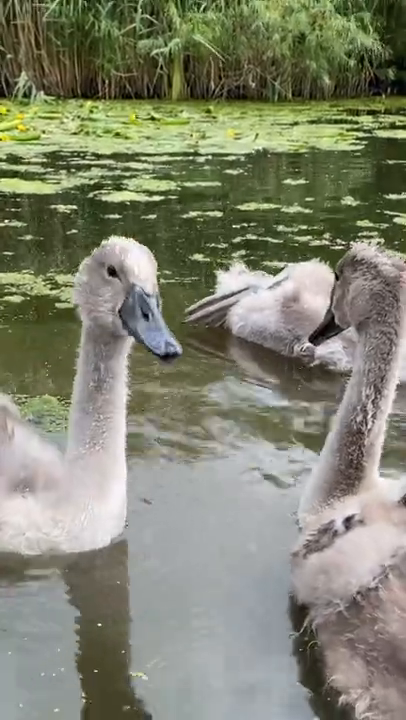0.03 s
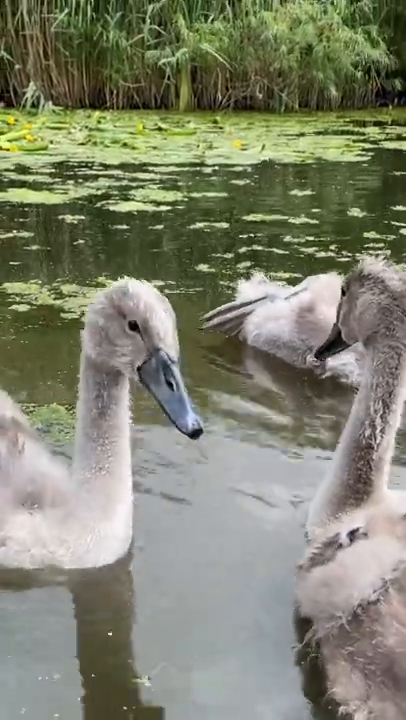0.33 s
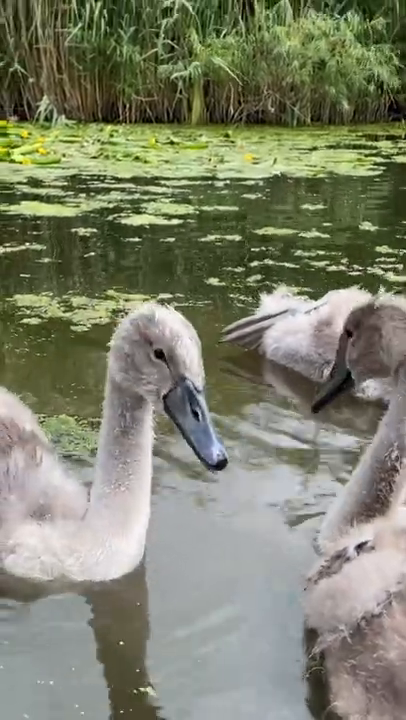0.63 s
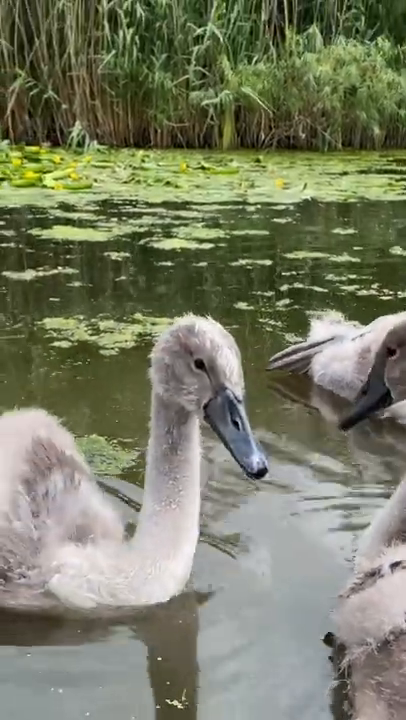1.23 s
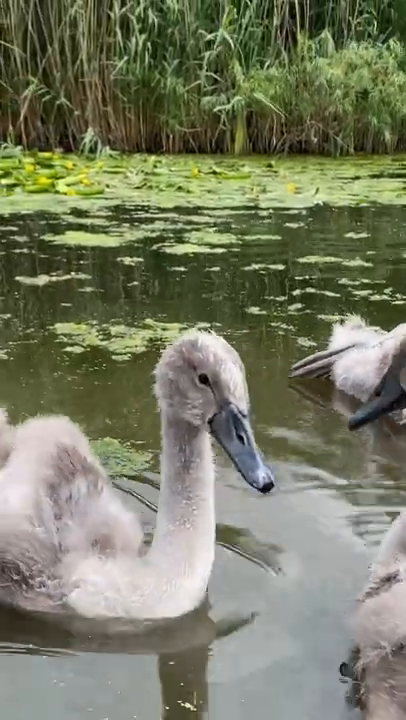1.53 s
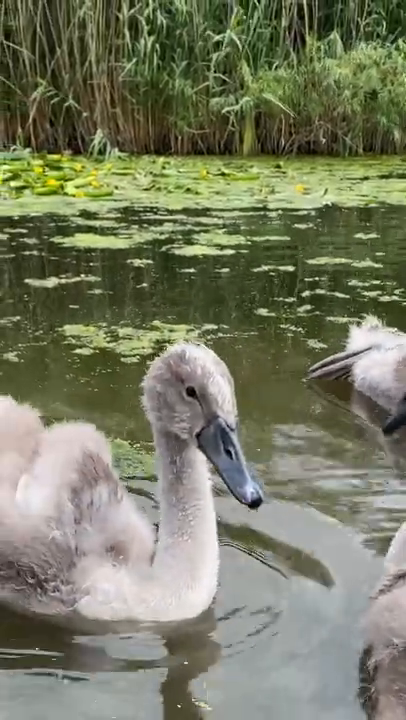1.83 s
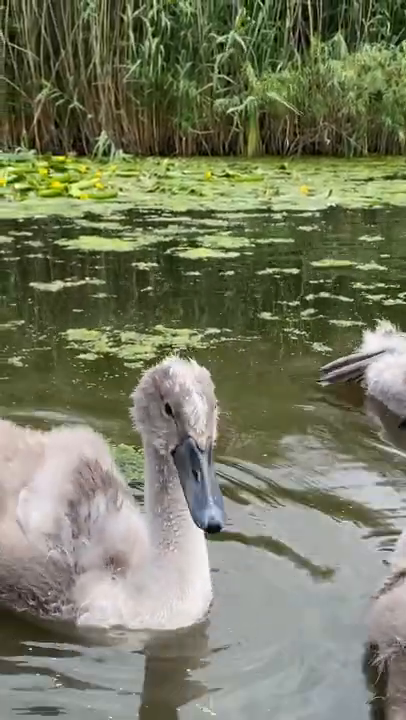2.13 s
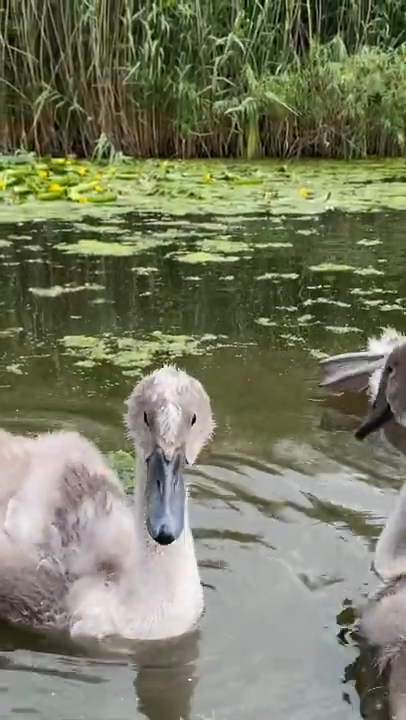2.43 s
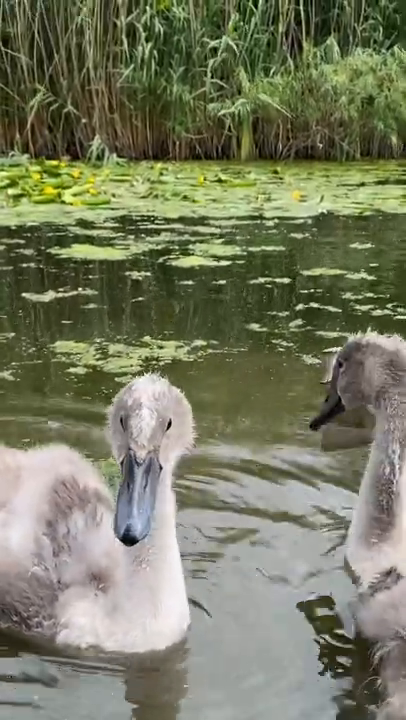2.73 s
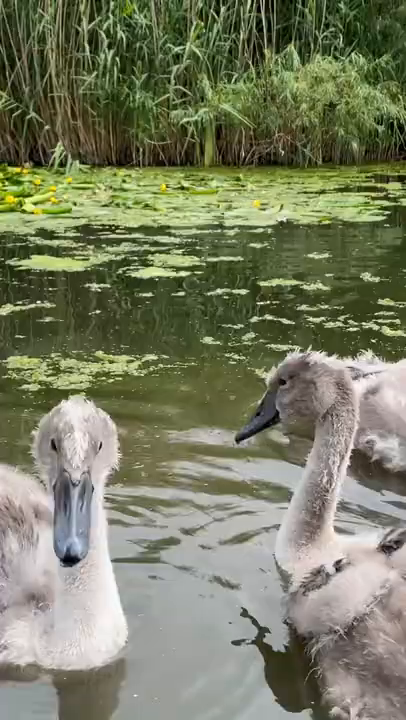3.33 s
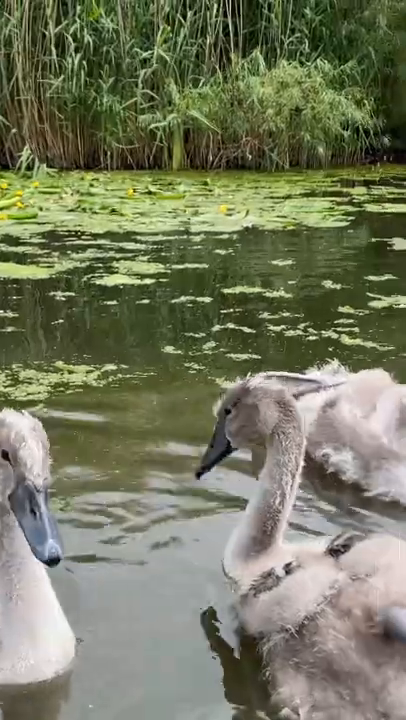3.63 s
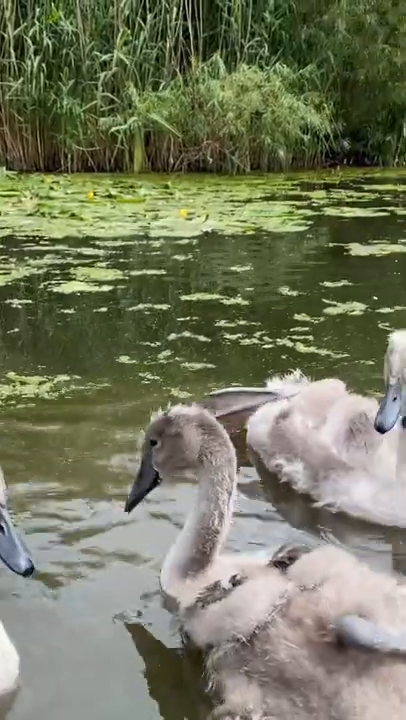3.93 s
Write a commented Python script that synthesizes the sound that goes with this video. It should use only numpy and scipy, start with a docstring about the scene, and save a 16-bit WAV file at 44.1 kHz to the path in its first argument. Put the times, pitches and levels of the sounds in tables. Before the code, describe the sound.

Young swans peep close by over soft paddling, water drips and a low rumble.

```python
"""Cygnets on a pond, close to a stereo microphone. From the start a low rumble and the whine of a
distant machine lie under them. One peep opens the scene and a few drops tick on the water. From about
one second the birds peep in short falling notes, and a splashy, bubbling rustle swells as they paddle.
After two seconds it fades and the notes turn to rising ones, many with a fast flutter. The drops come
thicker, and the loudest peeps follow just after three seconds."""
import sys
import numpy as np
from scipy import signal
from scipy.fft import rfft, irfft
from scipy.io import wavfile

SR = 44100
rng = np.random.default_rng(int(sys.argv[2]) if len(sys.argv) > 2 else 0)


def digitize_waveform(pressure):
    """Quantize a signal to 16-bit integers and store it at the path in sys.argv[1].

    Rows of a 2-D input are taken as channels; values are limited to [-1, 1].
    """
    field = np.atleast_2d(pressure).T
    bounded = np.clip(field, -1, 1)
    quanta = np.round(bounded * 32767).astype(np.int16)
    wavfile.write(sys.argv[1], SR, quanta)


N = 176400
T = np.arange(N) / SR

# The calls, close by. Each row: start in seconds, length in seconds, level in dB, top pitch in Hz,
# glide as a share of that pitch, flutter depth (capped at 1), flutter rate in Hz,
# centre of the strain as a share of the note, overtone boost in dB.
FALLING_PEEPS = [(0.876, 0.037, -62, 2180, 0.061, 0.4, 60, .5, 0),
                 (1.084, 0.051, -45, 2372, 0.11, 0.4, 62.4, 0.15, 5),
                 (1.249, 0.039, -56.5, 2090, 0.056, 0.42, 60, 0.41, 0),
                 (1.29, 0.072, -40, 2440, 0.19, 0.1, 60, 0.45, -1),
                 (1.419, 0.054, -42.5, 2440, 0.13, 1.1, 43.8, 0.18, 11),
                 (1.512, 0.062, -42, 2500, 0.23, 0, 60, 0.51, -13),
                 (1.603, 0.055, -44, 2520, 0.15, 1.2, 48.7, 0.34, 12),
                 (1.76, 0.045, -45, 2430, 0.13, 0.3, 60, 0.41, 0),
                 (1.791, 0.056, -43.5, 2510, 0.24, 0.87, 59, 0.47, -5),
                 (2.019, 0.058, -48, 2500, 0.2, 1.1, 78.5, 0.28, 8)]
RISING_PEEPS = [(-.07, 0.11, -37, 2243, 0.075, 0.057, 70, 0.34, -8),
                (2.09, .11, -54, 2275, 0.12, 0.95, 69.6, .5, 7),
                (2.29, 0.1, -59, 2280, 0.11, 0.67, 69, 0.15, 14),
                (2.349, 0.058, -60.5, 1814, -0.015, .2, 70, 0.34, -10),
                (2.5, 0.075, -57, 2210, 0.11, 0.22, 70, 0.089, 13.5),
                (2.551, 0.09, -54, 1994, 0.037, 0.22, 70, 0.57, -8),
                (2.75, 0.095, -61, 2004, .04, 0.22, 70, 0.46, 5),
                (2.874, 0.083, -44.5, 2016, 0.048, 0.47, 71.6, 0.55, -1.5),
                (3.099, .1, -33.5, 2280, 0.1, 0.8, 75, 0.63, 2),
                (3.335, 0.12, -36, 2320, 0.11, 0.83, 68.3, 0.295, 2)]
# Pitch through a note. Each row: share of the note, share of the glide below the top pitch.
FALL_PATH = [(0, .2), (.08, 0), (.32, .08), (.65, .45), (1, 1.05)]
RISE_PATH = [(0, 1), (0.351, 0.499), (.72, 0.0043), (.87, 0.085), (1, 1.17)]
# Loudness through a note. Each row: share of the note, gain in dB.
FALL_SHAPE = [(0, 3.5), (.18, 3), (.7, 0.5), (1, -14.5)]
RISE_SHAPE = [(0, -8), (.3, 0), (0.581, 3), (.82, -1), (1, -12)]
FALL_OVERTONES_DB, RISE_OVERTONES_DB = [-21, -29, -48], [-11, -29, -43]   # weights of harmonics 2 to 4
def cygnets():
    """The young birds near the microphone: nearly pure falling peeps and brighter rising ones."""
    falling = sum(peep(*row, FALL_PATH, FALL_SHAPE, FALL_OVERTONES_DB) for row in FALLING_PEEPS)
    rising = sum(peep(*row, RISE_PATH, RISE_SHAPE, RISE_OVERTONES_DB) for row in RISING_PEEPS)
    return falling + rising


STRAIN_SPAN_S, RELAXED_DB, RASP = 0.048, -11, .45
PINCH_BEND, JITTER = .03, .006   # shares of the top pitch
ATTACK_S, RELEASE_S = .004, 0.0061
def peep(start, length, db, top_hz, glide, depth, flutter_hz, centre, boost_db, path, shape, overtones_db):
    """One gliding whistle. Where the voice strains it brightens, rasps and flutters."""
    t = np.arange(int(length * SR)) / SR
    share = t / length
    from_centre = t - centre * length
    strain = np.exp(-(from_centre / STRAIN_SPAN_S) ** 4)
    flutter = np.clip(depth, 0, 1) * strain
    opening = abs(np.sin(np.pi * flutter_hz * from_centre))
    # Each pinch of the flutter bends the pitch down and trades the fundamental for overtones.
    pinch = flutter * (1 - opening) ** 1.25
    hz = top_hz * (1 - glide * along(path, share) - PINCH_BEND * pinch ** 2 + JITTER * drift(200)[:len(t)])
    phase = 2 * np.pi * np.cumsum(hz) / SR
    overtones = sum(from_db(weight) * np.sin(k * phase) for k, weight in enumerate(overtones_db, 2))
    rasp = 1 + RASP * strain * drift(360)[:len(t)]
    brightness = (1 - flutter * opening ** 2) * from_db(boost_db + RELAXED_DB * (1.5 - strain))
    voice = np.sin(phase) * (1 - pinch) + overtones * rasp * brightness
    ramp = np.clip(np.minimum(t / ATTACK_S, (length - t) / RELEASE_S), 0, 1)
    envelope = np.sin(np.pi / 2 * ramp) ** 2 * from_db(db + along(shape, share))
    return np.interp(T - start, t, np.sqrt(2) * voice * envelope, 0, 0)


# Drops on the near water. Each row: start in seconds, level in dB, ring pitch in Hz, splat boost in dB.
DROPS = [(.092, -48, 6500, -7), (.168, -54.5, 4000, 0), (0.646, -51.5, 3440, -30), (.756, -54, 3800, -3),
         (1.183, -54.5, 3420, -3), (2.623, -49, 3050, -1), (2.646, -44.5, 2280, -12),
         (2.693, -42, 1420, -22), (2.698, -51, 2850, 4), (2.704, -55, 2950, 6), (2.724, -47, 5440, -15),
         (2.831, -51.5, 8200, 1), (2.851, -47, 7200, 2), (2.858, -49, 5560, -3), (2.925, -33.5, 4880, -7.5),
         (2.931, -38, 9500, -8), (2.944, -36.5, 3980, -21), (3.054, -45, 3900, -7),
         (3.071, -49.5, 2290, -3), (3.386, -47.5, 3960, -9), (3.483, -46.5, 2170, -26),
         (3.501, -41, 6030, -6.5), (3.683, -39.5, 10700, -12.5), (3.754, -36.5, 13000, -14),
         (3.976, -46, 9050, -8), (3.982, -44, 3550, -2)]
DROP_CYCLES = 87   # to die away by 60 dB
SPLAT_BAND_HZ, SPLAT_DECAY_S, SPLAT_DB = (1810, 15000), .0014, 6.5
def drops():
    """Each drop is a tiny splat and the short ring of a bubble."""
    t, out = np.arange(SR // 20) / SR, 0
    band = signal.butter(1, SPLAT_BAND_HZ, "band", fs=SR, output="sos")
    for start, db, hz, boost_db in DROPS:
        splat = signal.sosfilt(band, rng.standard_normal(len(t)) * np.exp(-t / SPLAT_DECAY_S))
        ring = np.sin(2 * np.pi * hz * t) * from_db(-60 * t * hz / DROP_CYCLES)
        drop = from_db(db) * (ring + from_db(SPLAT_DB + boost_db) * splat)
        out += np.interp(T - start, t, drop, 0, 0)
    return out


# Slaps, close by. Each row: start in seconds, level in dB, decay time in seconds.
SLAPS = [(1.659, -37, 0.0037), (1.829, -48, 0.0039), (1.847, -37, 0.0025), (2.697, -40, 0.004),
         (2.712, -52, 0.019), (3.313, -48, 0.0055), (3.328, -49, 0.0047), (3.468, -58, .003),
         (3.501, -44, 0.0034)]
SLAP_BAND_HZ, SLAP_ATTACK_S = (700, 4100), 0.00056
def slaps():
    """Water slaps against the birds: short, broad bursts of noise."""
    band = signal.butter(2, SLAP_BAND_HZ, "band", fs=SR, output="sos")
    envelope = 0
    for start, db, decay in SLAPS:
        age = np.maximum(T - start, 0)
        envelope += from_db(db) * np.minimum(age / SLAP_ATTACK_S, 1) * np.exp(-age / decay)
    return envelope * rms_one(signal.sosfilt(band, rng.standard_normal(N)))


# Colours of the splashy rustle and its hiss. Each row: frequency in Hz, relative density in dB.
RUSTLE_COLOUR = [(250, -7), (900, 4), (1600, -2.5), (2100, 6), (2600, -0.5), (3000, 7), (3550, -2),
                 (4150, 10), (5000, -4.5), (5800, 4), (6900, -4.5), (7800, 6), (8400, -3.5), (8950, 5),
                 (9400, -5), (10200, 2.5), (11400, -15), (12200, 1), (12800, -12), (16000, -56)]
HISS_COLOUR = [(300, -16), (1000, -24.5), (2600, 5), (3100, 1.5), (3600, 1), (4200, 4), (5000, -3),
               (5850, 6.5), (6900, -7.5), (7900, -2.5), (9400, -1), (10300, 5), (11400, 0), (12200, -7),
               (12900, -21), (16000, -37)]
# Their swells. Each row: time in seconds, level in dB.
RUSTLE_LEVEL = [(1.3, -90), (1.55, -59), (1.66, -45), (1.77, -43.5), (1.86, -47.5), (1.94, -43),
                (2.03, -47), (2.1, -56.5), (2.25, -84)]
HISS_LEVEL = [(0, -90), (1.15, -80), (1.28, -62), (1.55, -55.5), (2.1, -56.5), (2.45, -57), (2.62, -64.5),
              (2.85, -69.5), (4, -73)]
GRAIN_DB, GRAIN_HZ = 1.3, 150
def rustle():
    """Paddling close by: a thin hiss comes and goes, and a finely grained rustle swells twice over it."""
    swells = patchy(noise(RUSTLE_COLOUR)) * from_db(along(RUSTLE_LEVEL, T) + GRAIN_DB * drift(GRAIN_HZ))
    return swells + noise(HISS_COLOUR) * from_db(along(HISS_LEVEL, T))


# Brightness of the rustle. Each row: time in seconds, treble against lows in dB.
RUSTLE_TILT = [(1.75, -1), (1.86, -10), (1.94, 11), (2.08, 2)]
PATCH_DB, PATCH_HZ = 1.6, 8
def patchy(x, bands=14):
    """Each band of the rustle swells and sinks by itself, while the whole tilts bright or dull."""
    place = np.interp(np.arange(N // 2 + 1) * SR / N, np.geomspace(800, 12000, bands), np.arange(bands))
    spectrum, tilt_db, out = rfft(x), along(RUSTLE_TILT, T), 0
    for k in range(bands):
        band = irfft(spectrum * np.maximum(1 - abs(place - k), 0), N)
        out += band * from_db(PATCH_DB * drift(PATCH_HZ) + tilt_db * (k / bands - .5))
    return out


BUBBLES_PER_S, BUBBLE_RANGE_HZ, BUBBLE_CYCLES = 220, (453, 3060), 9
BUBBLE_DB, BUBBLE_SPREAD_DB = -6, 4
def bubbles(pitches=16):
    """Bubbles burst at random in the churned water and ring briefly; they swell with the rustle."""
    out, base_db = 0, BUBBLE_DB + along(RUSTLE_LEVEL, T)
    for hz in np.geomspace(*BUBBLE_RANGE_HZ, pitches):
        bursts = rng.random(N) < BUBBLES_PER_S / pitches / SR
        pops = bursts * from_db(base_db + BUBBLE_SPREAD_DB * np.minimum(rng.exponential(1, N), 2))
        decay, angle = from_db(-60 * hz / BUBBLE_CYCLES / SR), 2 * np.pi * hz / SR   # per sample
        out += signal.lfilter([0, np.sin(angle)], [1, -2 * decay * np.cos(angle), decay ** 2], pops + 1e-18)
    return out


ECHO_DB, ECHO_T60_S = -29.5, 0.96
def reed_echo(x):
    """A faint scatter comes back to the microphone from the reeds on the banks."""
    t = np.arange(SR // 2) / SR
    tail = rng.standard_normal((2, len(t))) * from_db(-60 * t / ECHO_T60_S)
    return from_db(ECHO_DB) * signal.fftconvolve(x[None], rms_one(tail) / np.sqrt(len(t)), axes=1)[:, :N]


# The far hum. Each row: pitch in Hz, level in dB, waver in dB.
HUM_TONES = [(60.3, -42.5, 3.5), (180.6, -56, 4)]
# The whine. Each row: pitch in Hz, level in dB, waver in dB, left over right in dB, left lead in radians.
WHINE_TONES = [(507.3, -62, 1.5, -1, -1.2), (828, -71, 2, -1.7, 0), (1015.1, -58, 1, 4.6, .05),
               (1523, -75, 2, 0, 0)]
# Its dip. Each row: time in seconds, gain in dB.
WHINE_GAIN = [(0, 0.5), (1.4, -4), (2.1, 0.5)]
def machine():
    """A machine in the distance: a low hum, and a whine that dips in level and returns."""
    hum = sum(machine_tone(*row) for row in HUM_TONES)
    whine = sum(machine_tone(*row) for row in WHINE_TONES)
    return hum + from_db(along(WHINE_GAIN, T)) * whine


PITCH_WANDER, WANDER_HZ, WAVER_HZ = 0.001226, 3.63, 3.25
def machine_tone(hz, db, waver_db, pan_db=0, lead=0):
    """One held stereo tone that wavers slightly in pitch and level."""
    sides = np.array([[.5], [-.5]])
    phase = 2 * np.pi * np.cumsum(hz * (1 + PITCH_WANDER * drift(WANDER_HZ))) / SR
    gain = from_db(db + pan_db * sides + waver_db * drift(WAVER_HZ))
    return np.sqrt(2) * gain * np.sin(phase + lead * sides)


# Colours of the air around the pond. Each row: frequency in Hz, relative density in dB.
RUMBLE_COLOUR = [(20, -39), (32, -19), (45, -0.5), (60, -2.5), (75, -1), (115, 0), (150, -6), (200, -7.5),
                 (300, -16), (420, -24.5), (650, -30), (1200, -62.5)]
WASH_COLOUR = [(100, -17), (250, 1.5), (450, -3.5), (700, -12), (1500, -43)]
WHIRR_COLOUR = [(1300, -37), (1540, 7.5), (1850, -40)]
AIR_COLOUR = [(100, -13), (400, 5), (650, -0.5), (950, 7.5), (1300, -1), (2000, -4), (3000, -11),
              (4200, -14.5), (5000, -15.5), (5800, -17), (7000, -19.5), (10500, -22), (12000, -28),
              (15000, -68)]
# How each moves. Each row: time in seconds, level in dB.
RUMBLE_LEVEL = [(0, -39), (.7, -40), (1.42, -37), (2.02, -41), (2.6, -39), (3.5, -41), (4, -40)]
WASH_LEVEL = [(0, -65), (1.2, -62), (1.39, -46.5), (1.52, -56.5), (1.87, -48), (2.15, -60), (3.65, -57),
              (3.87, -49.5), (4, -46.5)]
WHIRR_LEVEL = [(0, -64.5), (1.001, -67.5), (4, -97)]
AIR_LEVEL = [(0, -53.5), (1, -55.5), (2, -56), (3.4, -58.5), (4, -54.5)]
def open_air():
    """All around: low rumble, a gusty wash, a faint narrow whirr that dies away and a soft hiss."""
    layers = [(RUMBLE_COLOUR, RUMBLE_LEVEL), (WASH_COLOUR, WASH_LEVEL),
              (WHIRR_COLOUR, WHIRR_LEVEL), (AIR_COLOUR, AIR_LEVEL)]
    return sum(noise(colour) * from_db(along(level, T)) for colour, level in layers)


# Stereo width at the microphone. Each row: frequency in Hz, side against mid in dB.
STEREO_WIDTH = [(60, -91), (125, -37), (270, -12), (580, 0.5), (1200, -3.5), (2600, -18.5), (5500, -9),
                (12000, -12.5)]
def noise(colour):
    """Stereo noise of a given colour, alike on both sides in the bass and wider above; rms 1."""
    log_hz = np.log(np.arange(N // 2 + 1) * SR / N + 1)
    gain, width = (from_db(along([(np.log(hz), db) for hz, db in table], log_hz))
                   for table in (colour, STEREO_WIDTH))
    mid, side = rfft(rng.standard_normal((2, N)))
    left_right = (mid + width * side * [[1], [-1]]) / np.sqrt(1 + width ** 2)
    return rms_one(irfft(gain * left_right, N))


def drift(hz):
    """Smooth random wander with rms 1, mostly slower than the given rate."""
    pole = np.exp(-40 * np.pi * hz / SR)   # one step every 20 samples
    slow = signal.lfilter([1], [1, -2 * pole, pole ** 2], rng.standard_normal(N // 20 + 4002))[4000:]
    return np.interp(np.arange(N) / 20, np.arange(len(slow)), rms_one(slow))


def from_db(db):
    """Decibels to gain."""
    return 10 ** (np.asarray(db) / 20)


def rms_one(x):
    """Scale to rms 1."""
    return x / np.sqrt(np.mean(x ** 2) + 1e-20)


def along(points, x):
    """Straight lines through the points."""
    return np.interp(x, *np.transpose(points))


def scene():
    """Birds and water close in front; the reeds, the far machine and the open air around them."""
    near = cygnets() + drops() + slaps() + bubbles()
    return near + reed_echo(near) + rustle() + machine() + open_air()


# How far the right side lags the left. Each row: frequency in Hz, lag in radians.
RIGHT_LAG = [(0, 0), (300, 0), (1000, .15), (1950, .4), (2300, .82), (3700, .5), (4570, 1.3), (4860, 3.1),
             (5200, 6), (7150, 7.5), (9000, 8.2), (11100, 9.3), (12500, 9.45), (14000, 9.7), (22050, 12.5)]
CUTOFF_HZ = 15500
def record(dry):
    """The right side lags the left; the whole sound is dulled above about 15 kHz."""
    size = 2 * N
    lag = along(RIGHT_LAG, np.arange(N + 1) * SR / size)
    right = irfft(rfft(dry[1], size) * np.exp(-1j * lag), size)[:N]
    lowpass = signal.cheby2(12, 60, CUTOFF_HZ, fs=SR, output="sos")
    return signal.sosfilt(lowpass, [dry[0], right])


dry = scene()
out = record(dry)
digitize_waveform(out)
```